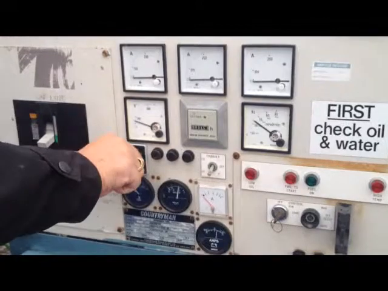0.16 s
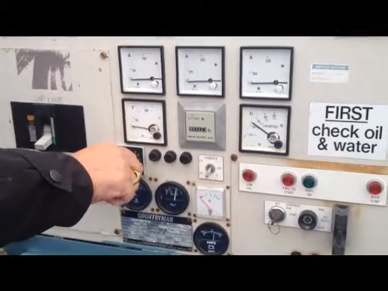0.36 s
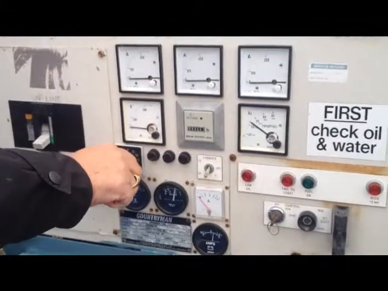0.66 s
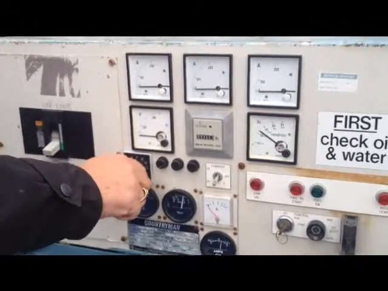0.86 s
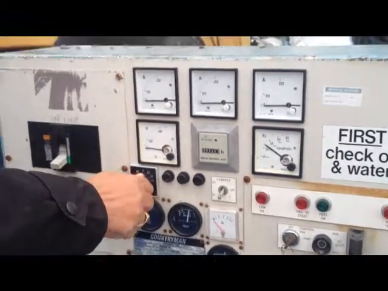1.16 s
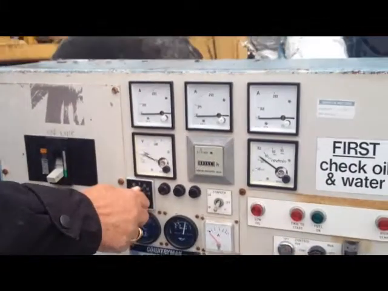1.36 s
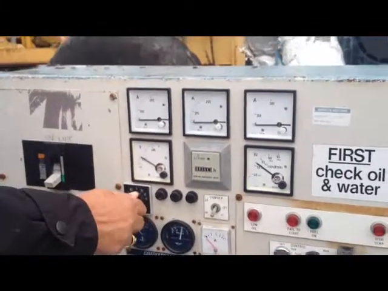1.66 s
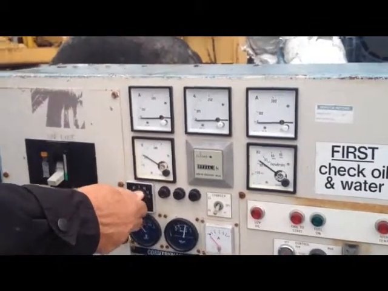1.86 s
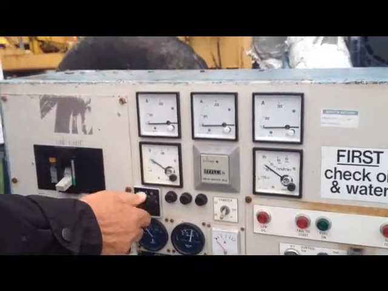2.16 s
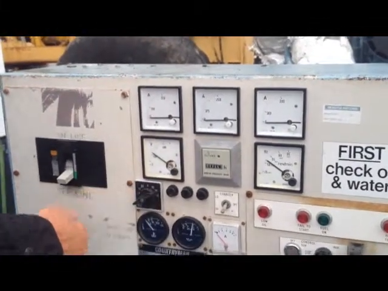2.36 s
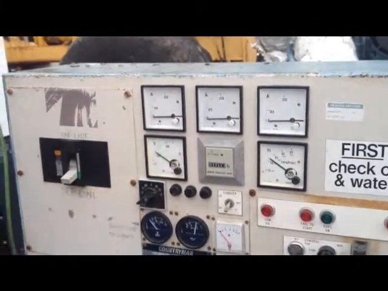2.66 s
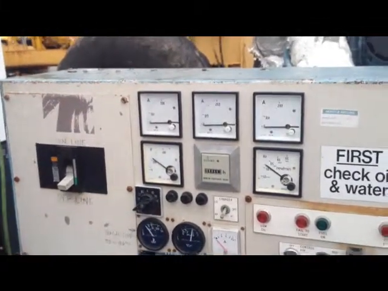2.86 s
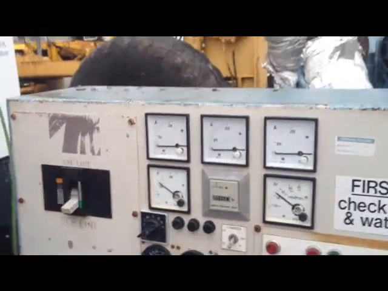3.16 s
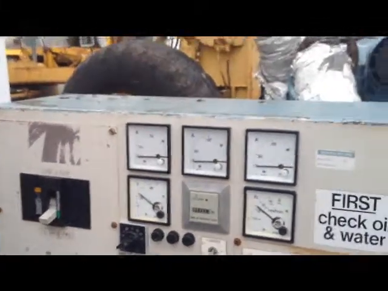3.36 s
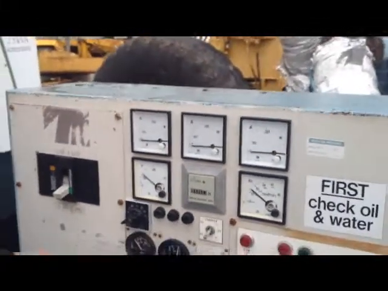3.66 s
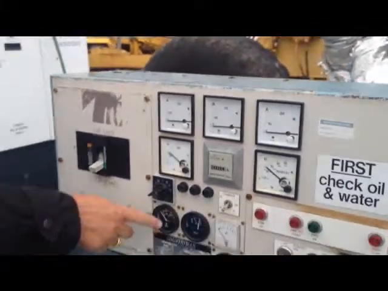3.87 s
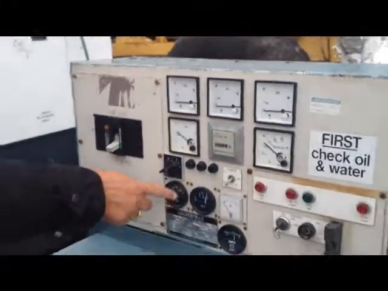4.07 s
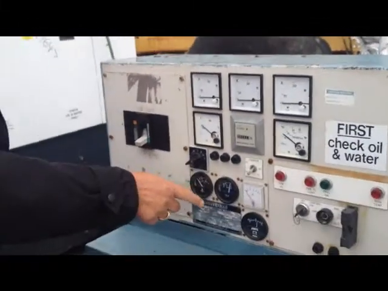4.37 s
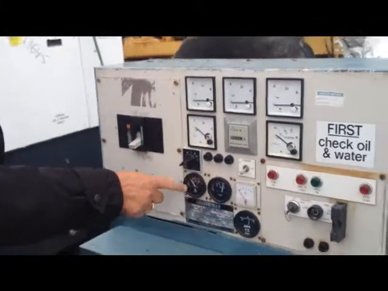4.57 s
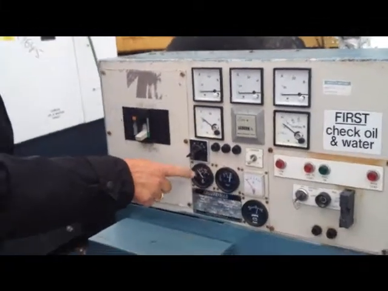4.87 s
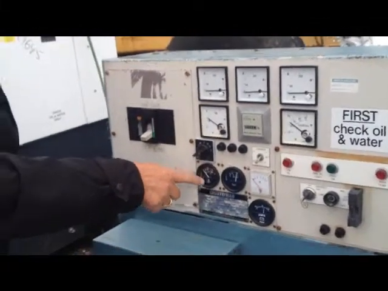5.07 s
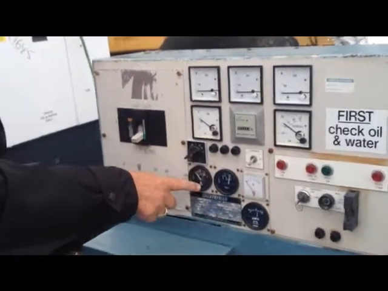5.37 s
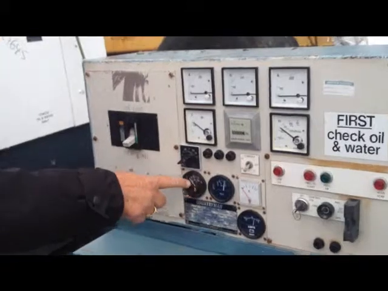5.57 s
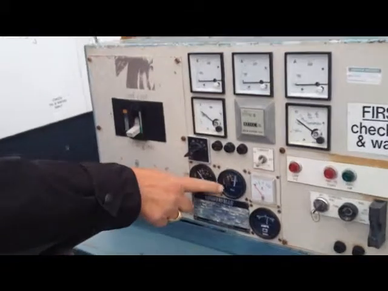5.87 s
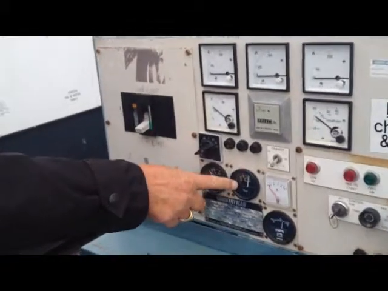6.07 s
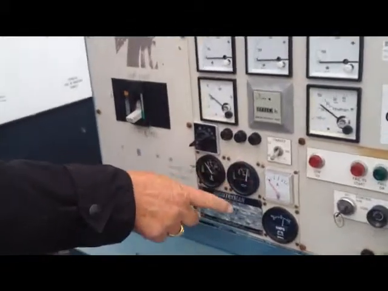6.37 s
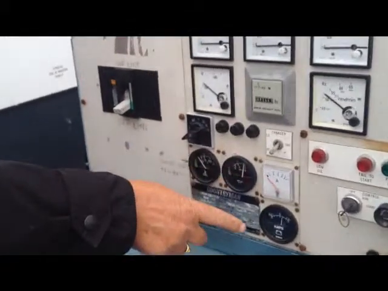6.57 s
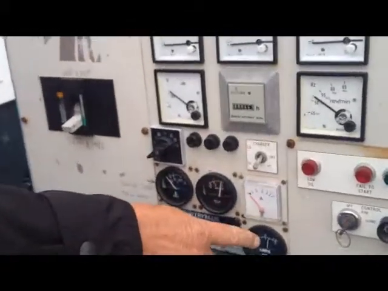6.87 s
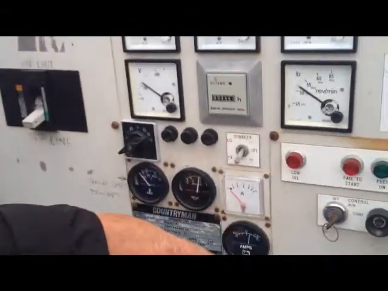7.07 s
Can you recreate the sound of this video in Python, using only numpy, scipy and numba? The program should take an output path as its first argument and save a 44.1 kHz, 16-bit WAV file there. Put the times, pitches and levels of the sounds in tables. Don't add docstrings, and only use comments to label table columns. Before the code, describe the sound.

Loud constant-speed diesel engine outdoors, low exhaust drone under dense rattling metal noise, its tone shifting as the microphone sways and turns.

```python
import sys
import numpy as np
from scipy import signal
from scipy.fft import rfft, irfft
from scipy.io import wavfile
from scipy.ndimage import uniform_filter1d, minimum_filter1d
from numba import njit

SR = 44100
rng = np.random.default_rng(int(sys.argv[2]) if len(sys.argv) > 2 else 0)


def undo_db(level):
    steps = np.asarray(level, float) / 20
    return 10 ** steps


def file_out(sig):
    cols = np.atleast_2d(sig).T
    lim = np.clip(cols, -1, 1)
    pcm = np.round(lim * 32767).astype(np.int16)
    wavfile.write(sys.argv[1], SR, pcm)


N = 318402

# start_s, extra_path_ms
STANCE = [
    (0.0, -0.29),
    (2.7, 0.06),
    (3.6, -0.13),
    (4.2, 0.17),
    (5.4, 0.48),
    (7.22, -0.34),
]
# start_s, facing_away (0-1)
FACING = [
    (0, 0.6),
    (2.3, 0.84),
    (2.8, 0.1),
    (3.8, 0.4),
    (4.3, 0.95),
    (5.8, 1),
    (6.4, 0.1),
    (7.22, 0.06),
]
# pitch_hz, level_db (rms), first_crest_s
FAN = (262.14, -29.5, .00278)
# pitch_hz, level_db (per Hz)
ROAR_SPECTRUM = [(20, -86), (60, -80), (100, -73), (150, -59), (200, -54), (250, -52), (290, -58),
                 (330, -63), (430, -66)]
# pitch_hz, level_db (per Hz)
CLATTER_SPECTRUM = [(180, -45), (300, -6.5), (437, -7.5), (600, -3.5), (1040, -5), (1140, -8.5),
                    (1260, -4.5), (2550, -11.5), (4300, -14.5), (8130, -22), (9890, -29.5), (11000, -27.5),
                    (14000, -30), (15600, -39)]
CYLINDER_DB = (7, -0.5, 4, 5.5, 6, 3)
# pitch_hz, width_hz, boost_db
PANELS = [(494, 26, 2.5), (620, 33, 3.5), (773, 142, 3.5), (1012, 200, 4), (1155, 16, 4.5), (1630, 12, 5.5),
          (2100, 180, 2), (4370, 790, 2), (5200, 610, -1), (6550, 350, 0.5), (11000, 180, 4)]
# pitch_hz, width_hz, boost_db
END_MODES = [(1200, 23, -0.5), (1534, 17, 5), (1980, 64, 0.5), (2270, 93, 1.5), (3830, 70, 2.5),
             (4320, 90, -3), (4820, 90, -0.5), (5580, 99, 5.5), (8400, 900, 2.5)]
# pitch_hz, width_hz, boost_db
SIDE_MODES = [(530, 30, 5.5), (2150, 60, 2), (2530, 170, -1.5), (3230, 60, -1.5), (3520, 300, 0.5),
              (5330, 400, 0.5), (6650, 700, 2)]
# order (multiple of the engine cycle), level_db (rms)
ENGINE_ORDERS = [(6, -55), (9, -44.7), (10, -38.6), (12, -22.7), (13, -44.6), (14, -46.2), (15, -28.3),
                 (16, -39.8), (17, -33.6), (18, -20.5), (19, -39), (20, -42.5), (21, -29.8), (22, -42),
                 (24, -37.9), (26, -44), (27, -43.0), (28, -46.5), (29, -45), (30, -43.9), (42, -45),
                 (48, -39.0), (51, -44.5), (57, -44), (58, -44.0), (60, -44), (72, -43.5), (78, -46),
                 (81, -42.1), (96, -44.8)]
FAMILY_SURGE = [(.2, .6), (.38, .9), (.12, .3), (.17, 0.)]
FAMILY_LAG = (0., -2.9, -1.6, 1.26, -2.2, -1.6)

CYCLE_HZ = 13.1148
HUNT_HZ = 4.07
SETTLE_S, SETTLE_SPAN_S = 5.2, 0.5
HIGH_ORDER_SURGE = 0.45
COARSE = 8


def evened(x):
    return x / np.sqrt(np.mean(x ** 2) + 1e-20)


def read(points, hz):
    f, value = np.transpose(points)
    return np.interp(np.log(hz + 1), np.log(f + 1), value, left=-140, right=-140)


def curves(rows, t):
    s, *columns = np.transpose(rows)
    return [np.interp(t, s, column) for column in columns]


def ramp(t, at_s, span_s):
    return 0.5 + 0.5 * np.tanh((t - at_s) / span_s)


def bumps(modes, hz):
    return sum(db / (1 + (2 * (hz - f) / width) ** 2) for f, width, db in modes)


def drift(rate_hz, count=1, size=1):
    t = np.arange(0, N, 256) / SR
    f = np.geomspace(0.0974 * rate_hz, rate_hz, 12)[:, None]
    rows = []
    for _ in range(count):
        sines = np.sin(2 * np.pi * (f * t + rng.random(f.shape)))
        rows.append(evened(sines.sum(0)))
    return np.array([np.interp(np.arange(0, N, size) / SR, t, row) for row in rows])


def arrival():
    t = np.arange(N) / SR
    return t - curves(STANCE, t)[0] / 1000


def hunt(lag, size=1):
    t = arrival()[::size]
    depth = 1 - 0.75 * ramp(t, SETTLE_S, SETTLE_SPAN_S)
    return depth * np.cos(2 * np.pi * HUNT_HZ * t - lag)


def fan():
    t = arrival()
    pitch_hz, level_db, first_crest_s = FAN
    blade = 2 * np.pi * pitch_hz * (t - first_crest_s)
    cancel = 1 - 1.3 * np.exp(-(t - 3.36) ** 2)
    level, turn = drift(14, count=2)
    strength = cancel * undo_db(1.8 * level) * (1 + HIGH_ORDER_SURGE * hunt(0.4))
    overtone = undo_db(-40.5 + 0.6 * t) * strength * np.sin(2 * blade + 0.7 * turn)
    return np.sqrt(2) * (undo_db(level_db) * np.cos(blade) + overtone)


def roar():
    z = rfft(rng.standard_normal(N)) * undo_db(read(ROAR_SPECTRUM, np.fft.rfftfreq(N, 1 / SR)))
    return np.sqrt(SR / 2) * irfft(z, N)


def repeating_noise(turns):
    steps = round(SR / CYCLE_HZ)
    patterns = rng.standard_normal((4, steps))
    place = np.round(turns * steps).astype(int) % steps
    shares = 0.81 + drift(1.2, count=4)
    return (patterns[:, place] * shares).sum(0) / np.sqrt((shares ** 2).sum(0))


def knocks(turns):
    firing, since = np.divmod(6 * turns, 1)
    firing = firing.astype(int)
    uneven = undo_db(3.8 * np.tanh(rng.standard_normal(600) / 2))
    strength = undo_db(CYLINDER_DB)[firing % 6] * uneven[firing] * (1 + 0.16 * hunt(0.38))
    valves = 0.1 * np.exp(-((since - 0.5) / 0.027) ** 2)
    knock = strength * np.exp(-since / 0.32) + valves
    return evened(uniform_filter1d(knock, size=60) * rng.standard_normal(N))


def clatter():
    turns = CYCLE_HZ * (arrival() - 0.0004)
    layers = [repeating_noise(turns), rng.standard_normal(N), knocks(turns)]
    hz, t, (again, new, gated) = signal.stft(layers, SR, nperseg=1024)
    hz = hz[:, None]
    repeat_share = 0.42 / (1 + (hz / 4000) ** 2) / (1 + (450 / (hz + 1)) ** 4)
    gate_share = (1 - repeat_share) * np.clip(0.19 * hz / (hz + 1000), 0, 1)
    new_share = 1 - repeat_share - gate_share
    z = np.sqrt(repeat_share) * again + np.sqrt(gate_share) * gated + np.sqrt(new_share) * new

    away = np.clip(curves(FACING, t)[0], 0, 1)
    middle = 1 / (1 + (1500 / (hz + 1)) ** 4)
    treble = 1 / (1 + (7500 / (hz + 1)) ** 8)
    shade_db = -1.4 * (middle - treble) - 2.5 * treble
    tilt_db = away * (shade_db + bumps(SIDE_MODES, hz)) + (1 - away) * bumps(END_MODES, hz)

    swing = np.interp(t, np.arange(N) / SR, hunt(0.2))
    body_surge_db, treble_surge_db = 1.05, 0.7
    tilt_db = tilt_db + swing * (body_surge_db + (treble_surge_db - body_surge_db) * middle)
    patches = uniform_filter1d(rng.standard_normal(z.shape), size=4, axis=0)
    patches = evened(uniform_filter1d(patches, size=22, axis=1))
    level_db = -25 + tilt_db + 1.54 * patches
    sound = signal.istft(z * undo_db(level_db), SR, nperseg=1024)[1][:N]

    fine = np.fft.rfftfreq(N, 1 / SR)
    colour = undo_db(read(CLATTER_SPECTRUM, fine) + bumps(PANELS, fine))
    band = (fine > 400) & (fine < 1500)
    colour = colour / np.sqrt((colour[band] ** 2).sum() / len(fine))
    return undo_db(-1.44) * irfft(rfft(sound) * colour, N)


def order_family(k):
    if k % 6 == 0:
        return 0
    if k % 3 == 0:
        return 1
    return 2 if k % 2 == 0 else 3


def exhaust():
    t = arrival()[::COARSE]
    low = undo_db(-1.5 * curves(STANCE, t)[0] + ramp(t, 6.2, 0.2) - 0.34)
    high = undo_db(2 * ramp(t, SETTLE_S + 0.4, SETTLE_SPAN_S) - 0.5)
    first_firing_s = 0.00616
    angle = 2 * np.pi * CYCLE_HZ * (t - first_firing_s) + 0.01 * hunt(2.6, COARSE)
    retune = 0.52 * hunt(0.7, COARSE)
    surges = [1 + depth * hunt(lag, COARSE) for depth, lag in FAMILY_SURGE]
    pulsing = 1 + HIGH_ORDER_SURGE * hunt(0.4, COARSE)
    silencer_hz, silencer_width_hz = 258, 48
    out = np.zeros(len(t))
    for k, db in ENGINE_ORDERS:
        level, turn = drift(2.5, count=2, size=COARSE) if k > 40 else (0, 0)
        lag = FAMILY_LAG[k % 6]
        if k in (6, 9, 16):
            lag += np.pi
        if k % 12 == 0 and k > 20:
            lag += 1.5
        near_peak = np.exp(-((k * CYCLE_HZ - silencer_hz) / silencer_width_hz) ** 2)
        phase = k * angle - lag + near_peak * retune + 0.4 * np.tanh(turn)
        surge = surges[order_family(k)] if k < 40 else pulsing
        out += undo_db(db + 1.4 * level) * (low if k < 17 else high) * surge * np.cos(phase)
    return np.sqrt(2) * signal.resample_poly(out, COARSE, 1, padtype="line")[:N]


def scene():
    drive = undo_db(1.3 - 0.7 * ramp(arrival(), 5.9, 0.3))
    return (drive * (fan() + roar() + clatter() + exhaust()))[None]


@njit
def duck(x, crest, ceiling, step, climb, most):
    gain, out, wait = 1., np.ones(len(x)), 0
    for i in range(len(x)):
        if wait <= 0 and abs(x[i]) * gain > ceiling:
            gain = step * gain * (ceiling / (crest[i] * gain)) ** 1.3
            wait = 130
        gain = min(gain * climb, most)
        wait = wait - 1
        out[i] = gain
    return out


def top_cut(x):
    return signal.sosfilt(signal.butter(12, 15020, fs=SR, output="sos"), x)


def record(dry):
    sensed = uniform_filter1d(dry[0], size=40)
    crest = -minimum_filter1d(-abs(sensed), size=121)
    gain = duck(sensed, crest, undo_db(-6.3), undo_db(-2.1), undo_db(38 / SR), 1.)
    ducked = dry * uniform_filter1d(gain, size=24)
    spill = np.maximum(abs(ducked) - 0.42, 0)
    rounded = ducked - np.sign(ducked) * (spill - 0.105 * np.tanh(spill / 0.105))

    hz, t, z = signal.stft(rounded, SR, nperseg=2048)
    wander = evened(uniform_filter1d(rng.standard_normal(len(t)), size=3))
    spare = wander + 1.1 - 1.5 * curves(FACING, t)[0] - 0.12 * t
    edge_hz = np.array([13700, 14180, 14680, 15150])[np.digitize(spare, [-0.4, 0.4, 1.8])]
    mix = signal.istft(z * (hz[:, None] < edge_hz), SR, nperseg=2048)[1][:, :N]
    return top_cut(mix)


dry = scene()
out = record(dry)
file_out(out)
```